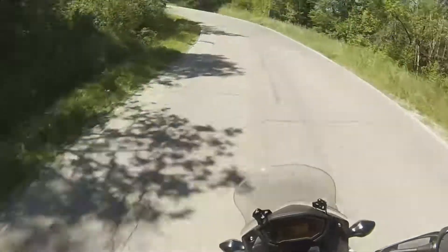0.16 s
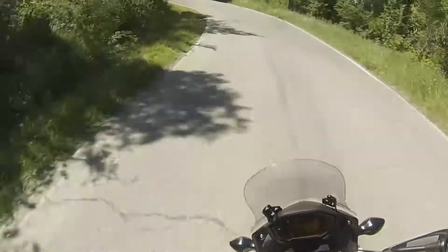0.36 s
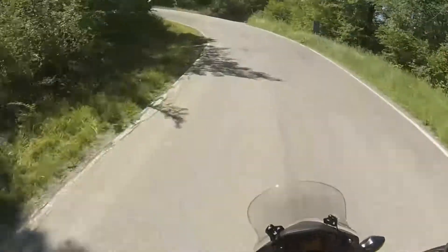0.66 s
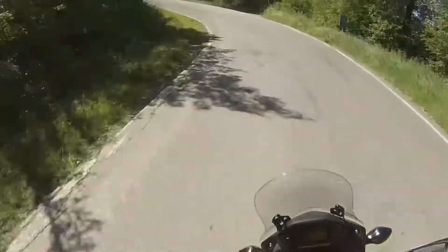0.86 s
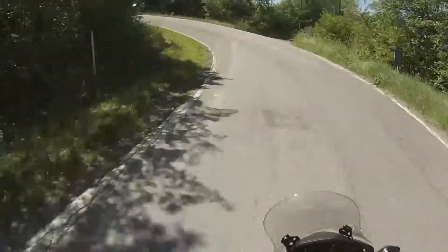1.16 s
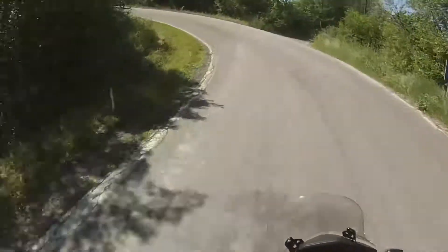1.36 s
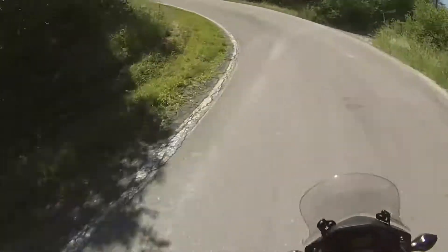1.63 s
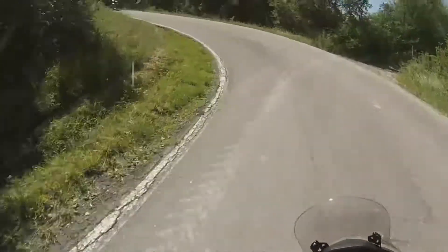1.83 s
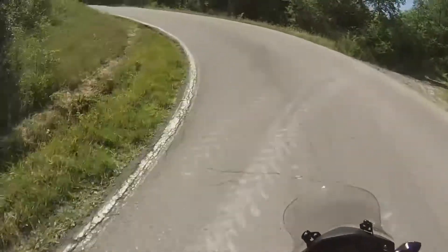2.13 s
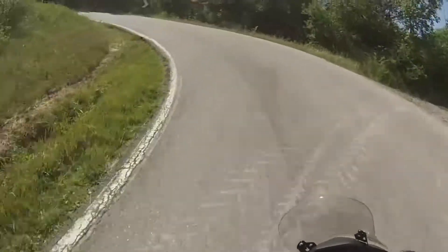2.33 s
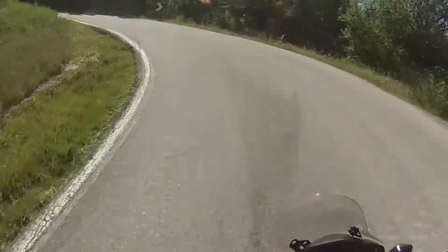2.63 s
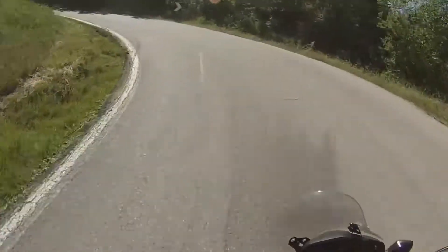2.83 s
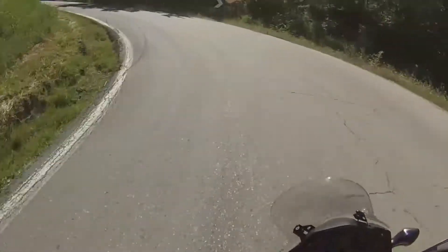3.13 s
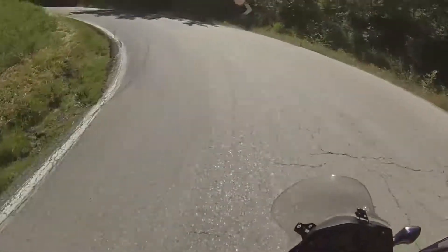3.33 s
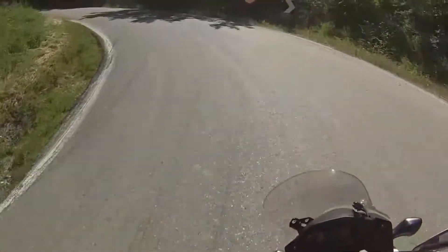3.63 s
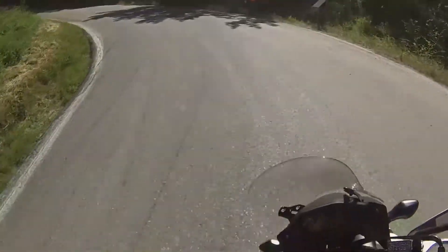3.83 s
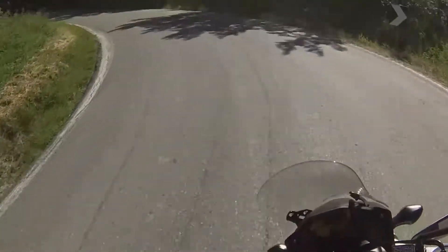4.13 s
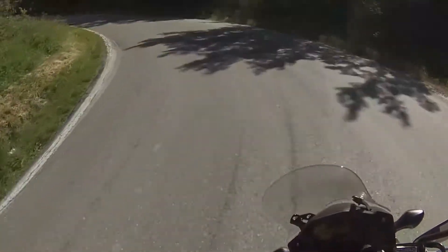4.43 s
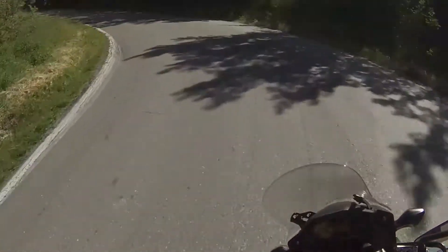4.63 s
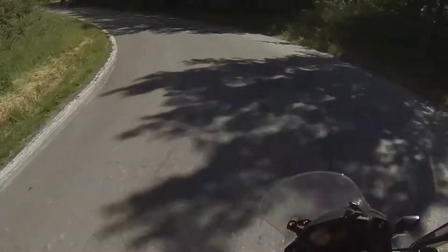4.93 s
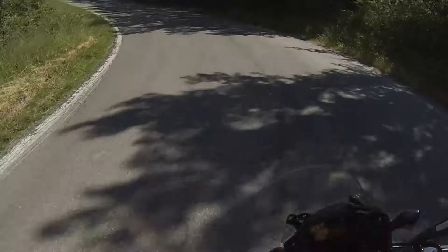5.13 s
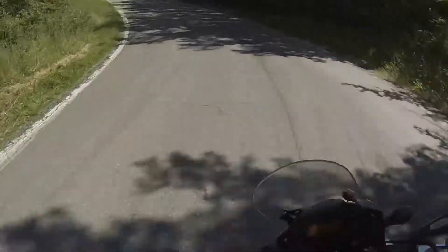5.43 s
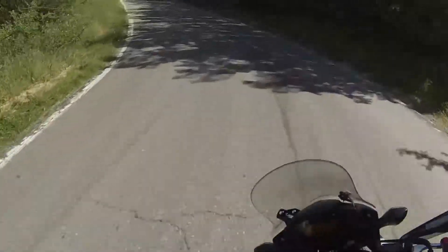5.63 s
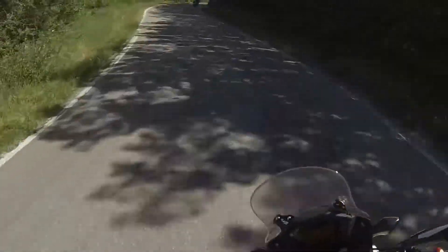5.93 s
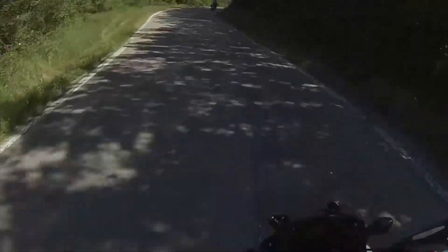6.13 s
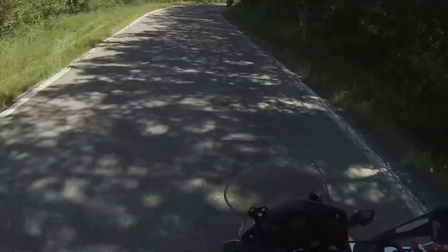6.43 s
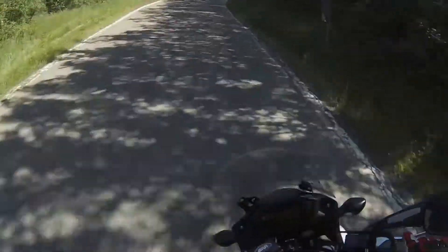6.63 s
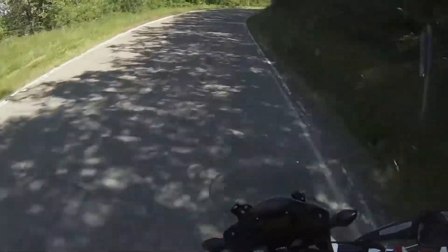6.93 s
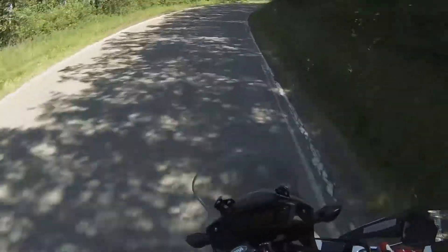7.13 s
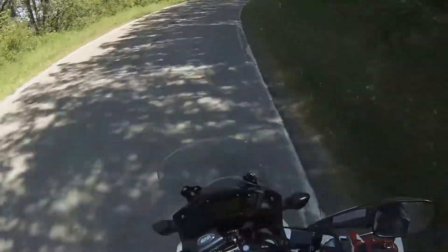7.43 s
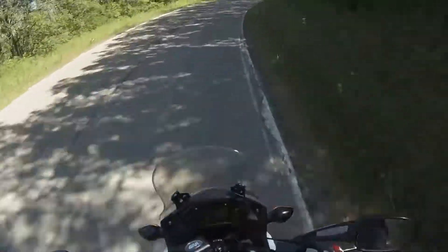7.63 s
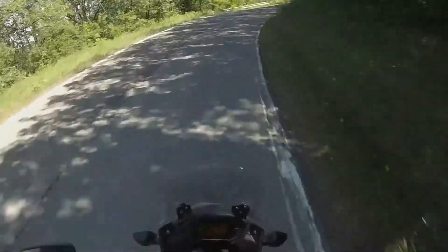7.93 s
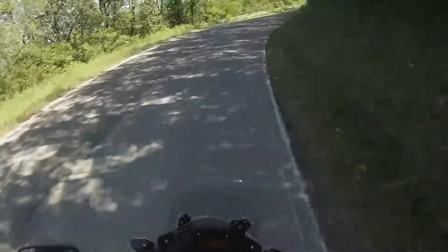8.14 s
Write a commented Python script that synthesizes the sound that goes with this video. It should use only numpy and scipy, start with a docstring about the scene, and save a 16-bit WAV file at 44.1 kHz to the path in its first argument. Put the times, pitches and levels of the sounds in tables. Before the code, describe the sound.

Wind drums and roars on a small enclosed microphone, drops away as a scooter slows, then its engine climbs and the wind returns loud.

```python
"""Wind drums on the closed housing of a small camera and roars through its resonances.
The camera rides a motor scooter through a bend: the wind drops as the rider slows, and returns.
A short squeak comes early; gears chatter at slack throttle while a low tone moans upward.
Then the engine takes load and its tones climb. Wind, chatter and squeak are shaped noise;
the engine and gear tones are sines that follow the engine cycle."""
import sys
import numpy as np
from scipy import signal
from scipy.io import wavfile
from scipy.ndimage import uniform_filter1d

SR = 44100
rng = np.random.default_rng(int(sys.argv[2]) if len(sys.argv) > 2 else 0)


def gain_from_decibels(decibels):
    """Convert decibel values to linear amplitude factors."""
    exponent = np.asarray(decibels, float) / 20
    return 10 ** exponent


def wav_record(signal):
    """Record a signal, one row per channel, as 16-bit PCM in the file named by sys.argv[1]."""
    frames = np.transpose(np.atleast_2d(signal))
    bounded = np.clip(frames, -1, 1)
    # unit amplitude maps onto the largest positive 16-bit level
    quanta = np.round(bounded * 32767).astype(np.int16)
    wavfile.write(sys.argv[1], SR, quanta)


N = 364707
T = np.arange(N) / SR  # time in seconds

# colour of the lumpy wind pressure before the housing: pitch_hz, density_db (dB per Hz)
DRUM_COLOUR = [(29, -48), (50, -8), (75, 0), (104, -2.5), (123, -12.5), (150, -54.5), (200, -60.5),
               (330, -120)]
# chance swells (+) and dips (-) of the low lumpy noise: middle_s, change_db, length_s
SWELLS_AND_DIPS = [(0.41, 3.5, 0.079), (0.53, 6, 0.06), (0.63, -24, 0.052), (0.85, 5, 0.067),
                   (1.29, 12.5, 0.039), (2.43, 12.5, .1), (3.27, 8.5, .12), (3.68, 2, .1),
                   (4.03, 4.5, 0.09), (4.78, 4, 0.19), (4.84, -21, 0.087), (5.53, 8.5, 0.096),
                   (5.85, 6, 0.044), (6.27, -9, 0.064), (6.61, -9.5, 0.15), (6.68, 8.5, 0.063),
                   (6.73, -6, .05), (7.3, -10, .08), (7.58, 2, 0.067), (7.69, 7, 0.077), (7.83, 7, 0.11),
                   (8.2, 5, .12)]
# swells (+) and dips (-) of the low thumping near 42 Hz: middle_s, change_db, length_s
THUMP_SWELLS = [(1.7, 3, 0.27), (1.98, -13, 0.2), (2.13, 7, .15), (2.92, 8.5, 0.3), (3.7, -12, .3),
                (4.03, 7, 0.19), (4.67, 3, 0.15), (4.98, 2, 0.16), (5.69, -22, 0.14), (5.84, 5.5, 0.25),
                (6.75, -3, 0.5), (7.5, -1, 0.36)]


def drumming():
    """Low lumpy wind pressure, with the narrow, fairly steady bounce of the camera on its mount."""
    bounce_hz, bounce_width_hz = 41.7, 12.4
    thump_db = -6  # the bounce against the buffeting, before its swells and dips
    bounce = evened(resonate(rng.standard_normal(N), bounce_hz, bounce_width_hz))
    bounce = steadied(bounce, 1.0, size=3000)
    lumps = turbulence(DRUM_COLOUR, 1.0, 0.26, size=4096)
    lumps = steadied(lumps, 0.44, size=3000)
    _, buffeting_db = air_stream()
    swelling_lumps = gain_from_decibels(swells(SWELLS_AND_DIPS)) * lumps
    thumping = gain_from_decibels(thump_db + swells(THUMP_SWELLS)) * bounce
    return gain_from_decibels(buffeting_db) * (swelling_lumps + thumping)


# colours of the air stream before the housing, low to high: pitch_hz, density_db (dB per Hz)
BODY_COLOUR = [(90, -15), (140, -4.5), (230, -8), (380, -13), (520, -23), (900, -62)]
MIDDLE_COLOUR = [(250, -30), (400, -3.5), (600, -5.5), (1000, -7), (1300, -12), (2200, -49.5)]
ROAR_COLOUR = [(500, -37), (950, -19.5), (1200, -2), (1700, -0.5), (2500, -3), (2800, -11), (3600, -16.5),
               (5000, -26), (8000, -59)]
TREBLE_COLOUR = [(2000, -26.5), (3200, 0.5), (5600, -5.5), (7000, -15.5), (7400, -14), (8300, -17),
                 (10000, -22.5), (11500, -24), (12500, -33), (14900, -43)]


def rush():
    """Body, middle, roar and treble of the air stream; all grow as the rushing gets louder."""
    roar_db, _ = air_stream()
    louder_db = roar_db + 36  # above a rushing level of -36 dB
    # each layer gains its own share of every dB of rushing
    body_db = -40 + 1.09 * louder_db
    middle_db = -47.5 + 0.82 * louder_db
    treble_db = -50.5 + 1.08 * louder_db
    fizz_db, fizz_s = 2.5, 0.2  # the treble fizzes up at first and settles
    treble_db = treble_db + fizz_db * np.exp(-T / fizz_s)
    body = gain_from_decibels(body_db) * turbulence(BODY_COLOUR, 0.92, 0.58, size=2048)
    middle = gain_from_decibels(middle_db) * turbulence(MIDDLE_COLOUR, 0.44, 0.46, size=1024)
    roar = gain_from_decibels(roar_db) * turbulence(ROAR_COLOUR, 0.68, 0.56, size=1024)
    treble = gain_from_decibels(treble_db) * turbulence(TREBLE_COLOUR, 0.68, 0.33, size=512)
    return body + middle + roar + treble


# strength of the air stream over the housing: time_s, rushing_db, buffeting_db
WIND = [(0.0, -35.5, -20.5), (0.4, -36, -19), (1.3, -36.5, -21.5), (1.8, -39.5, -26), (2.3, -42.5, -32),
        (2.7, -44, -40), (3.1, -45, -44), (3.6, -44, -36.5), (4.2, -43.5, -42.5), (4.6, -44.5, -33),
        (5.4, -39.5, -32), (5.9, -37, -24), (6.3, -34.5, -18.5), (6.9, -32, -16.5), (7.3, -32, -18),
        (7.6, -30.5, -22.5), (8.08, -36, -16.5), (8.27, -33, -21)]


def air_stream():
    """Levels of the rushing and of the buffeting along time, in dB."""
    return curves(WIND)


# resonances of the closed housing: pitch_hz, width_hz, peak_db (above a flat response)
HOUSING_MODES = [(174, 21, 5.5), (323.3, 40.4, 11.5), (1385, 214, 10.5), (1515.6, 38.5, 17.5),
                 (1947, 295, 6), (2178, 220, 5.5), (2556, 130, 4), (4780, 160, 4.5), (5300, 150, 2),
                 (6250, 200, 8), (6686, 510, 11), (9150, 600, 3.5)]


def housing(hz):
    """Gain of the housing: powers of its resonances added to a flat response."""
    power = 1
    for mode_hz, width_hz, peak_db in HOUSING_MODES:
        bell = 1 / (1 + (2 * (hz - mode_hz) / width_hz) ** 2) ** 2
        power = power + (gain_from_decibels(peak_db) ** 2 - 1) * bell
    return np.sqrt(power)


def turbulence(colour, patchy_db, flicker_db, size):
    """Noise of a given colour with drifting patches and gusts shared by all frequencies."""
    frames = 4 * N // size + 5
    hz = np.fft.rfftfreq(size, 1 / SR)
    real, imaginary, patches = rng.standard_normal((frames, len(hz), 3)).T
    patches = uniform_filter1d(patches, size=9, axis=0)  # over frequency
    patches = evened(uniform_filter1d(patches, size=12, axis=1))  # over time
    gusts = evened(uniform_filter1d(rng.standard_normal(frames), size=6))
    level_db = read(colour, hz)[:, None] + patchy_db * patches + flicker_db * gusts
    spectrum = (real + 1j * imaginary) * gain_from_decibels(level_db) * housing(hz)[:, None]
    noise = signal.istft(spectrum, nperseg=size, noverlap=3 * size // 4)[1]
    return evened(noise[:N])


# engine tones and the resonance each one meets:
# order (multiple of the cycle rate), peak_db (before the waver), peak_hz, width_hz
ORDER_PEAKS = [(1, -23, 41, 7), (2, -27, 78, 14), (7, -39, 318, 35), (8, -39, 332, 45), (9, -52, 300, 60),
               (11, -57, 440, 60), (12, -52, 545, 90), (16, -51, 735, 70), (17, -59, 770, 70),
               (19, -63, 650, 90), (20, -56, 660, 145), (21, -62, 960, 90), (24, -61, 680, 80),
               (25, -69, 710, 70), (26, -69, 740, 70), (75, -60, 2150, 130), (76, -57, 2150, 130),
               (77, -60, 2160, 130)]


def engine():
    """Multiples (orders) of the engine cycle swell as they climb through their resonances."""
    cycle_hz, turns = crank()
    out = np.zeros(N)
    step = 256  # gains are worked out once per this many samples
    coarse_t, coarse_hz = T[::step], cycle_hz[::step]
    for order, peak_db, peak_hz, width_hz in ORDER_PEAKS:
        waver = evened(uniform_filter1d(rng.standard_normal(len(coarse_t)), size=30))
        gain = peak(order * coarse_hz, peak_db + 1.4 * waver, peak_hz, width_hz)
        tone = np.cos(2 * np.pi * (order * turns + rng.random()))
        out += np.interp(T, coarse_t, gain) * tone
    return np.sqrt(2) * throttle() * out


# rate of the four-stroke cycles: time_s, cycle_hz
CYCLE = [(3.8, 26.95), (4.3, 27.51), (4.75, 28.0), (5.15, 29.33), (5.5, 31.59), (6.0, 35.41), (6.5, 39.6),
         (7.0, 43.5), (7.3, 45.5), (7.5, 46.4), (7.62, 46.3), (7.8, 44.8)]


def crank():
    """Cycle rate and the running count of cycles."""
    cycle_hz, = curves(CYCLE)
    return cycle_hz, np.cumsum(cycle_hz) / SR


def throttle():
    """Open through the climb out of the bend, from 0 to 1."""
    open_s, shut_s, opening_s, shutting_s = 3.83, 7.68, 0.26, 0.06
    return gate(open_s, shut_s, opening_s, shutting_s) ** 2


def firing(turns, length):
    """Push of each power stroke: a quick smoothed rise, then fading over a share of the cycle."""
    push = np.exp(-(turns % 1) / length)
    push = uniform_filter1d(push, size=60)
    return evened(uniform_filter1d(push, size=60))


def knock():
    """Each firing strikes a resonance near the housing's sharpest, a little unevenly, harder with speed."""
    fast_db, slowest_db = -37, -29.5  # level at high speed; change at the slowest cycle
    growth_hz = 2.9  # rise in cycle rate over which that change shrinks to about a third
    cycle_hz, turns = crank()
    blows = np.diff(np.floor(turns), prepend=0) * gain_from_decibels(1.5 * rng.standard_normal(N))
    drive = evened(blows) + 3.6 * rng.standard_normal(N) * firing(turns, 0.3)
    ring = resonate(resonate(drive, 1530, 55), 1530, 400)
    level_db = fast_db + slowest_db * np.exp((cycle_hz.min() - cycle_hz) / growth_hz)
    return gain_from_decibels(level_db) * throttle() * evened(ring)


# the load changes within each cycle and splits the gear tone: orders_away, level_db
SIDE_LINES = [(-2, -8), (-1, 0), (0, -3), (1, 0), (2, -4)]
# casing modes that the whine excites as it passes: pitch_hz, reach_hz, level_db
CASING = [(4000, 300, -58), (4140, 350, -59), (4360, 500, -55), (5200, 500, -59)]


def mesh():
    """Gear teeth sing at a fixed order and whine near its octave; each firing presses the whine harder."""
    tone_order, whine_order = 68, 138
    cycle_hz, turns = crank()
    tone = np.zeros(N)
    for orders_away, level_db in SIDE_LINES:
        order = tone_order + orders_away
        gain = peak(order * cycle_hz, -49, 1950, 230) * gain_from_decibels(level_db)  # loudest where it meets the casing
        tone += gain * np.cos(2 * np.pi * (order * turns + rng.random()))
    scrape = rng.standard_normal(N)
    whine_hz = whine_order * cycle_hz
    whine = steadied(evened(resonate(scrape, whine_hz, 130)), 0.4, size=200)
    whine = peak(whine_hz, -58, 4650, 1200) * whine
    for mode_hz, reach_hz, level_db in CASING:
        whine += peak(whine_hz, level_db, mode_hz, reach_hz) * evened(resonate(scrape, mode_hz, 110))
    return throttle() * (tone + whine * firing(turns, 0.9))


# bursts from slack gears: loudest_s, rise_s, fall_s, level_db, pitch_hz
BURSTS = [(2.86, 0.1, 0.27, -57.5, 3950), (3.4, .04, 0.11, -60, 3950), (3.6, .12, 0.12, -62, 4050),
          (3.8, .13, 0.048, -52.5, 4000), (3.93, .03, 0.055, -54.5, 3900)]
# under light throttle the chatter beats on: time_s, level_db, pitch_hz
BEATING = [(3.95, -72, 3900), (4.0, -64, 3880), (4.42, -57, 3930), (4.7, -66, 3880), (4.9, -57, 4040),
           (5.2, -59, 4030), (5.6, -70, 4050)]


def chatter():
    """Slack teeth rattle in ragged bursts, ringing two modes; under throttle they beat with the cycle."""
    rattle = rng.standard_normal(N)
    low_mode = gain_from_decibels(7.0) * evened(resonate(rattle, 1980, 320))
    bursts = np.zeros(N)
    for loudest_s, rise_s, fall_s, burst_db, pitch_hz in BURSTS:
        shape = gate(loudest_s - rise_s, loudest_s, rise_s, fall_s)
        bursts += gain_from_decibels(burst_db) * shape * (ringing(rattle, pitch_hz, 280) + low_mode)
    ragged = uniform_filter1d(rng.standard_normal(N), size=500)
    ragged = evened(uniform_filter1d(ragged, size=500))
    bursts *= gain_from_decibels(4.5 * ragged)

    level_db, beating_hz = curves(BEATING)
    ring = ringing(rattle, beating_hz, 240) + gain_from_decibels(-11) * evened(resonate(rattle, 5330, 150))
    _, turns = crank()
    pulse = 0.25 + 0.75 * firing(turns, 0.35)
    active = (T > BEATING[0][0]) * (T < BEATING[-1][0])
    return bursts + gain_from_decibels(level_db) * ring * pulse * active


def ringing(noise, hz, width_hz):
    """Noise rings a mode through a narrow and a broad resonance, its swelling partly evened out."""
    ring = resonate(resonate(noise, hz, width_hz), hz, 900)
    return steadied(evened(ring), 0.3, size=200)


def squeak():
    """A short fuzzy whistle of noise whose pitch and level follow one late arch."""
    start_s, length_s, level_db = 1.07, 0.23, -55
    base_hz, arch_hz = 4030, 240
    progress = np.clip((T - start_s) / length_s, 0, 1)
    arch = np.sin(np.pi * progress ** 1.8)
    return gain_from_decibels(level_db) * arch * ringing(rng.standard_normal(N), base_hz + arch_hz * arch, 110)


def moan():
    """A pure low tone that rises evenly in pitch, swells and fades."""
    start_s, loudest_s, end_s = 2.55, 3.14, 4.4
    start_hz, rise_hz_per_s = 139.7, 33.15
    level_db = -51.5 + np.interp(T, [start_s, loudest_s, end_s], [-10, 0, -18])
    hz = start_hz + rise_hz_per_s * (T - start_s)
    tone = np.sqrt(2) * np.sin(2 * np.pi * np.cumsum(hz) / SR)
    return gain_from_decibels(level_db) * gate(start_s, end_s, 0.1, 0.1) * tone


def read(points, hz):
    """Value of a spectrum at hz, straight on a log axis."""
    points_hz, value = np.transpose(points)
    return np.interp(np.log(hz + 1), np.log(points_hz + 1), value)


def curves(rows):
    """Every column of a table along time."""
    time_s, *columns = np.transpose(rows)
    return [np.interp(T, time_s, column) for column in columns]


def evened(x):
    """Scaled to an rms (average strength) of 1."""
    return x / np.sqrt(np.mean(x ** 2) + 1e-20)


def steadied(x, share, size):
    """Part of the random swelling taken out, then scaled to rms 1."""
    power = uniform_filter1d(x ** 2, size=size)
    return evened(x / (power + 0.05) ** (share / 2))


def resonate(x, hz, width_hz):
    """A steep resonance of gain 1 that follows hz: shift down to zero, low-pass, shift back."""
    turn = np.exp(2j * np.pi * np.cumsum(hz * np.ones(N)) / SR)
    r = np.exp(-np.pi * width_hz / SR)
    low_pass = [[(1 - r) ** 2, 0, 0, 1, -2 * r, r * r]]
    return 2 * (turn * signal.sosfilt(low_pass, x / turn)).real


def swells(rows):
    """Sum of bell-shaped rises and dips in dB."""
    t = T[::64]
    total_db = sum(db * np.exp(-(2 * (t - middle_s) / length_s) ** 2) for middle_s, db, length_s in rows)
    return np.interp(T, t, total_db)


def gate(start, end, rise, fall):
    """From 0 to 1 after start, back to 0 after end; all in seconds."""
    return np.clip(np.minimum((T - start) / rise, 1 + (end - T) / fall), 0, 1)


def peak(hz, db, peak_hz, width_hz):
    """Gain of a tone at hz near a broad resonance."""
    return gain_from_decibels(db) / (1 + (2 * (hz - peak_hz) / width_hz) ** 2)


def scene():
    """Wind and machine at one microphone."""
    wind = drumming() + rush()
    machine = engine() + knock() + mesh() + chatter()
    return (wind + machine + squeak() + moan())[None]


def top_cut(x):
    """Nothing passes above the cut-off."""
    return signal.sosfilt(signal.butter(12, 15000, fs=SR, output="sos"), x)


def record(dry):
    """Adds the microphone's own faint hiss and returns the finished sound."""
    hiss = gain_from_decibels(-78) * rng.standard_normal(dry.shape)
    return top_cut(dry + hiss)


dry = scene()
out = record(dry)
wav_record(out)
```